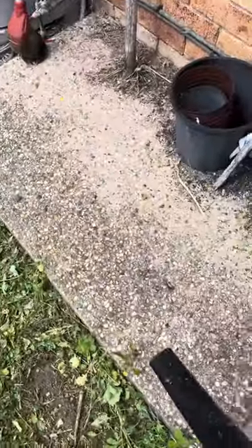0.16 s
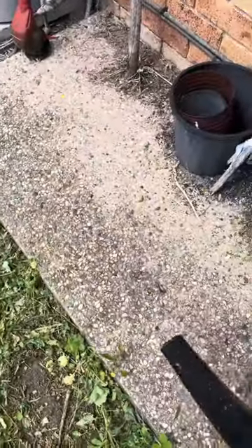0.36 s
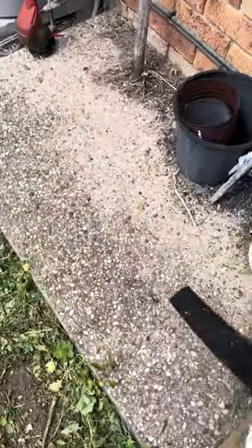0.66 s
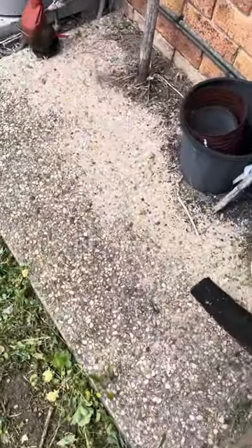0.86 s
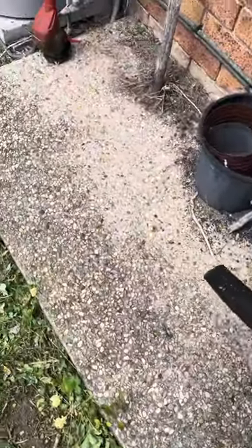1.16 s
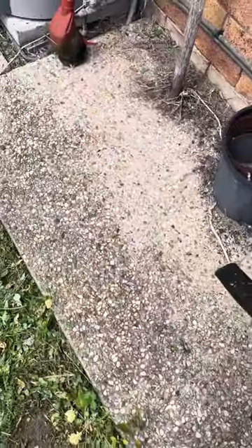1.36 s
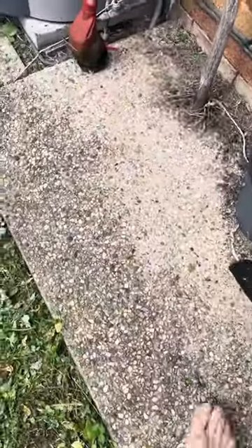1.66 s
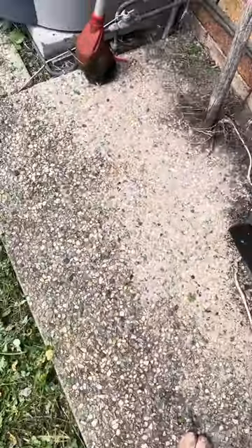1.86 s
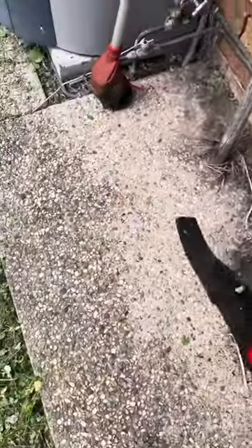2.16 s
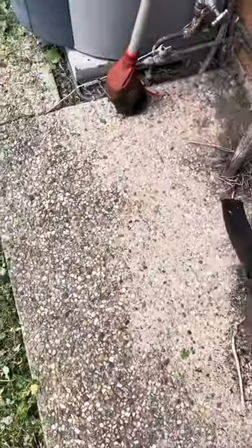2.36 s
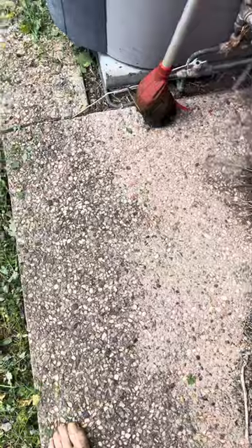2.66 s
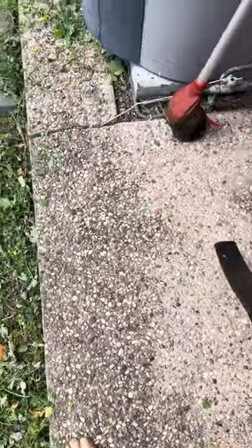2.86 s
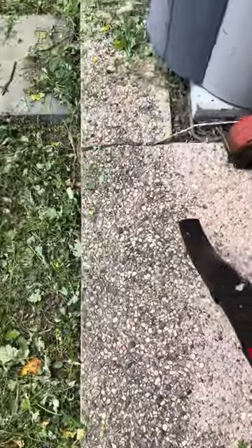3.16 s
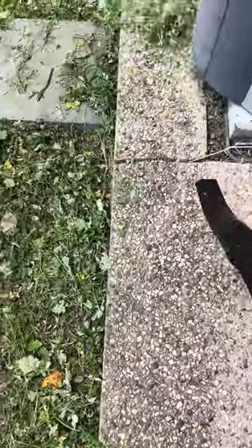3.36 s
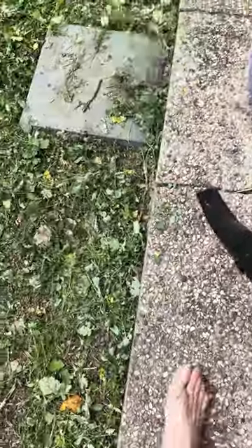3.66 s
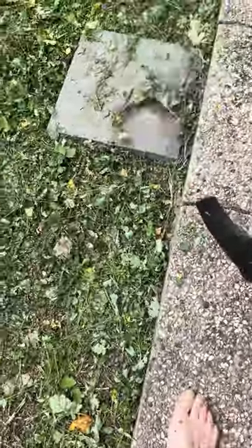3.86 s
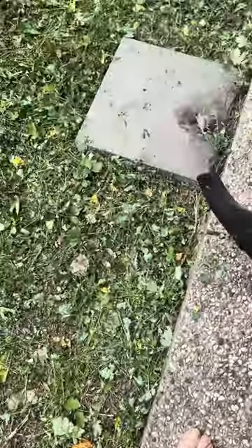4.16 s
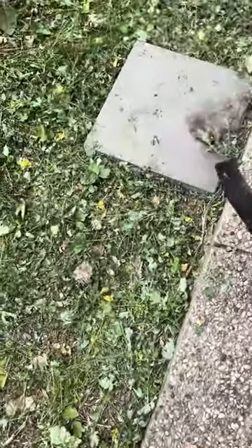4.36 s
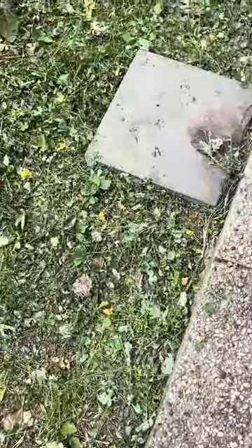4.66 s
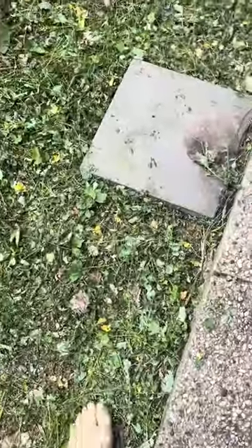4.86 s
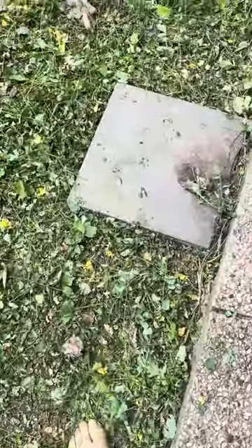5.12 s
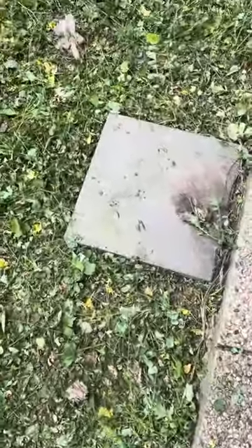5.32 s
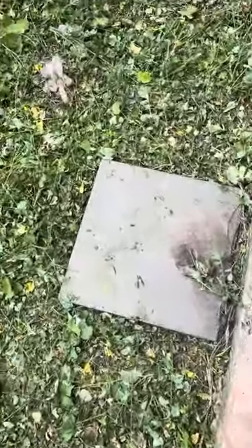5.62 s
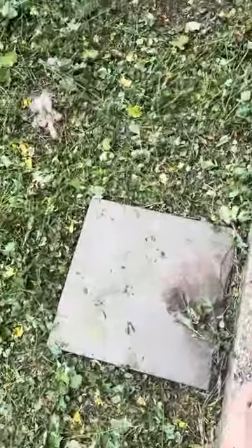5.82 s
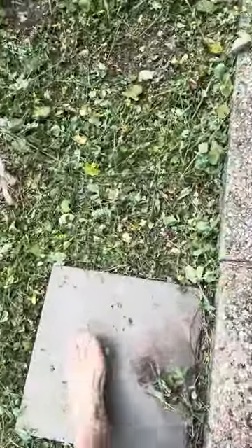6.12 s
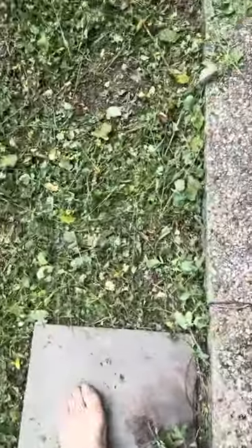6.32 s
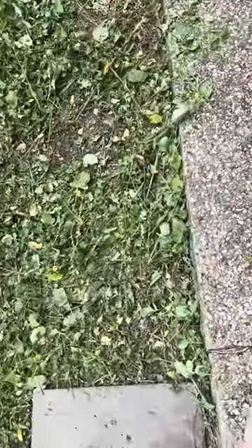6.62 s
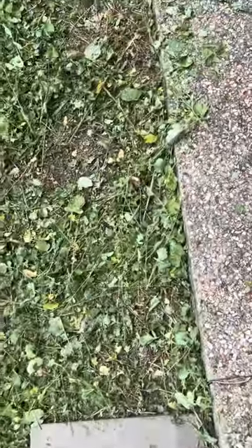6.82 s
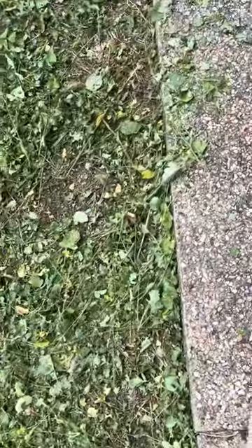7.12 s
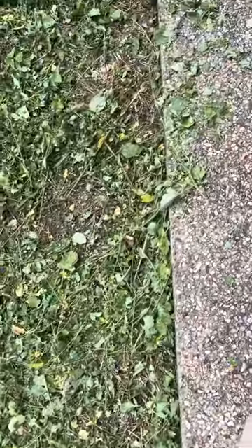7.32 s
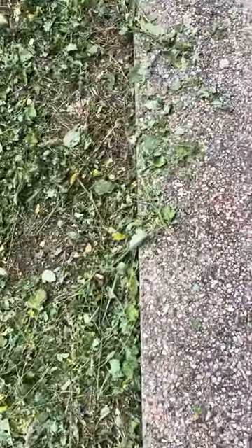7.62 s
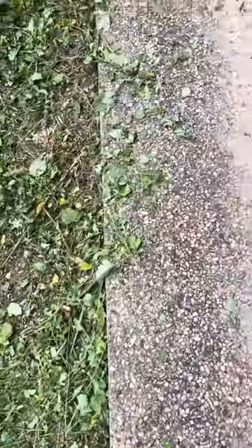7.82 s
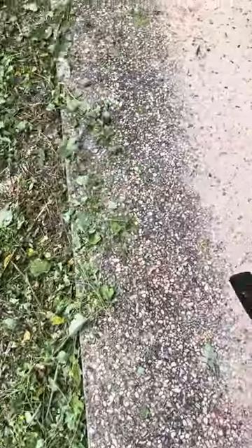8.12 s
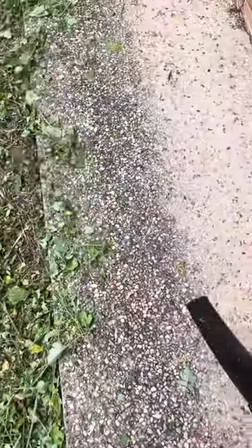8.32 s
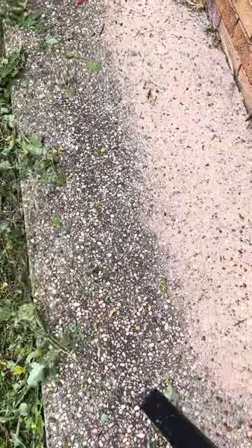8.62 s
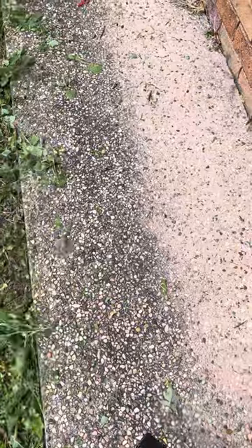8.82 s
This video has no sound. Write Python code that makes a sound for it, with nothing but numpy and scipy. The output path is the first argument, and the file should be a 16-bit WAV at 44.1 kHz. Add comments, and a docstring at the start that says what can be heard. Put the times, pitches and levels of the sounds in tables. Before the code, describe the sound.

Outdoors, close to a phone microphone, a handheld cordless leaf blower pushes a broad airy roar over paving from the very start, with fine hiss and slight low wind rumble. The fan whine, around 2 kHz, is weak and right-leaning at first, dips near 0.4 s, then swells to the left and is strongest around 0.75 s. It drops briefly at 1.6 s, returns more centred, and sings strongly from 2 to 4 s with short dips near 3.1 and 3.5 s. A faint octave overtone and low shaft hum flicker beneath. From 4 to 6 s the whine wavers slightly in pitch and the roar eases. Between 6 and 8 s everything is softer, the whine fluttering in and out. Around 8.3 s it nearly vanishes, its overtone briefly showing, then partly recovers as the air rush strengthens until the abrupt end at 9 s.

```python
"""A broad airy roar opens the scene; within a second a fan whine climbs through it, leaning right, then left.
This is a hand-held cordless leaf blower over paving, heard in stereo by a two-port phone microphone.
Coloured noise makes the roar of tube and housing, the jet's hiss and a little wind rumble on the microphone.
Sines locked to the fan's nine blades make the whine, its overtone and faint shaft hum;
level curves swell and dip them as the blower swings."""
import sys
import numpy as np
from scipy import signal
from scipy.fft import irfft, next_fast_len
from scipy.io import wavfile
from scipy.ndimage import uniform_filter1d, map_coordinates

SR = 44100
rng = np.random.default_rng(int(sys.argv[2]) if len(sys.argv) > 2 else 0)


def materialize(psi):
    """Save the field psi as 16-bit PCM at rate SR to the path in sys.argv[1].

    A 1-D psi becomes a single channel; in a 2-D psi each row is a channel.
    """
    bounded = np.clip(np.atleast_2d(psi).T, -1, 1)
    quanta = np.round(bounded * 32767).astype(np.int16)
    wavfile.write(sys.argv[1], SR, quanta)


N = 396018

T = np.arange(N) / SR
SIZE = next_fast_len(N)
F = np.arange(SIZE // 2 + 1) * SR / SIZE  # Hz of each spectrum bin


def undb(db):
    """Gain of a level in dB."""
    return np.exp(np.asarray(db) * (np.log(10) / 20))


def curves(table):
    """Columns of a time table, one value per sample."""
    start_s, *columns = np.transpose(table)
    return [np.interp(T, start_s, column) for column in columns]


def walk(rate):
    """Random wander: rate levels per second, each held, then smoothed twice; spread near 1."""
    hold = int(SR / rate)
    steps = np.repeat(rng.standard_normal(N // hold + 1), hold)
    return 1.535 * uniform_filter1d(uniform_filter1d(steps, hold), hold)[:N]


# Stereo spread along the spectrum: phase lead, balance and likeness of left and right;
# the top is nearly opposite in phase: pitch_hz, left_lead_rad, left_minus_right_db, likeness (0-1)
STEREO_SPREAD = [(0, 0, -.3, .985), (130, -.2, -.8, .995), (260, -.35, -1.5, .99), (350, -.62, -1.9, .97),
                 (520, -1.02, -3, .97), (800, -1.12, -3.7, .9), (1050, -1.12, -1.9, .76),
                 (1350, -.65, -.4, .83), (1800, .07, .3, .89), (2050, .53, 1.9, .87), (2350, 1.35, -1, .6),
                 (2850, 2.57, -3.1, .56), (3300, 2.25, -1.5, .35), (3800, 1.0, -2.3, .3),
                 (4400, 1.5, -3, .15), (4900, .82, -1.7, .57), (5400, 2.1, -.8, .7), (6100, 3.14, 0, .995),
                 (8100, 6.28, 0, .995), (10250, 9.42, 0, .995), (12400, 12.57, 0, .995),
                 (13600, 14.1, 0, .995), (14100, 15.71, 0, .998), (15800, 15.8, 0, .998)]


def stereo_spread(hz):
    """Phase lead, balance and likeness of left and right at a frequency."""
    pitch_hz, *columns = np.transpose(STEREO_SPREAD)
    return [np.interp(hz, pitch_hz, column) for column in columns]


def turbulence():
    """Spectra of white noise at left and right: partly shared, shifted and tilted."""
    lead, pan_db, like = stereo_spread(F)
    half_tilt = 10 ** (pan_db / 40) * np.exp(.5j * lead)  # half the spread goes to each side
    shared, left, right = rng.standard_normal((3, len(F))) + 1j * rng.standard_normal((3, len(F)))
    left_side = (np.sqrt(like) * shared + np.sqrt(1 - like) * left) * half_tilt
    right_side = (np.sqrt(like) * shared + np.sqrt(1 - like) * right) / half_tilt
    return np.array([left_side, right_side])


def rush(shape, db, parts, drift_db, flicker_db):
    """Coloured noise in overlapping bands of like power, each drifting and flickering alone."""
    noise, out = turbulence() * shape, 0
    power = shape ** 2
    band = np.cumsum(power) / np.sum(power) * parts - .5
    for k in range(parts):
        window = np.clip(1 - abs(np.clip(band, 0, parts - 1) - k), 0, 1)
        motion_db = drift_db * walk(1.49) + flicker_db * walk(22)
        out = out + irfft(noise * window, SIZE)[:, :N] * undb(motion_db)
    return out * undb(db) / np.std(out.mean(axis=0))  # levelled on the mean of left and right


def colour(points):
    """Gain through (Hz, dB) points on a log frequency scale, silent outside them."""
    hz, db = np.transpose(points)
    return undb(np.interp(np.log(F + 1), np.log(hz), db, left=-200, right=-200))


# Strength of the moving air: start_s, roar_db, then relative to the roar
# bass_db, hollow_middle_db, upper_middle_db, housing_db, treble_db; last wind_db (not relative)
AIR_LEVELS = [(0.1, -25.5, -5.5, -3, -9, -10.5, -16.5, -41), (0.65, -26, -3.5, -1.5, -6, -7.5, -14, -50),
              (1.2, -27, -6, -9, -4.5, -8, -15.5, -52), (1.75, -25, -11, -9, -11, -14, -18.5, -46.5),
              (2.3, -25.5, -7.5, -9, -4, -9.5, -14, -42.5), (2.85, -26.5, -9, -6.5, -6.5, -9, -14.5, -45),
              (3.4, -26.5, -9, -13, -13, -11, -17.5, -48), (3.95, -27, -10, -20, -12, -14, -18, -56),
              (4.5, -28, -8, -8, -6.5, -16.5, -15.5, -54), (5.05, -29, -6.5, -11, -3, -15, -17, -56),
              (5.6, -27.5, -6.5, -2.5, -13.5, -14.5, -18.5, -68),
              (6.15, -29, -6.5, -4.5, -8, -10.5, -18, -67), (6.7, -30.5, -6, -8, -15, -10.5, -16.5, -52),
              (7.25, -31.5, -10.5, -13, -7.5, -12.5, -16, -49),
              (7.8, -30, -13.5, -2.5, -15, -11.5, -15.5, -47.5),
              (8.35, -29.5, -14, -15, -13, -12.5, -17, -44.5), (8.9, -27.5, -15, -15, -8.5, -17, -19, -42)]


def air_levels():
    """The shared swell of the air: roar, bass, middle, upper, housing, treble and wind curves in dB."""
    return curves(AIR_LEVELS)


# Colour of the housing noise: pitch_hz, relative density_db (dB per Hz)
HOUSING_COLOUR = [(2000, 13.5), (2300, 1.5), (2700, -10), (3000, 5), (3500, 7.5), (3900, -3.5), (4400, 2)]


def housing():
    """Turbulent air ringing the housing: bright mid noise in sixteen restless bands."""
    roar_db, _, _, _, housing_db, _, _ = air_levels()
    return rush(colour(HOUSING_COLOUR), roar_db + housing_db, parts=16, drift_db=2.2, flicker_db=3.)


# Air resonances of the tube: pitch_hz, width_hz
TUBE_RESONANCES = [(230, 364), (450, 114), (640, 102), (800, 284), (1125, 55), (1345, 245), (1750, 940)]
# Trim of each resonance, in the same order: trim_db, added to its level curve
TUBE_TRIM = [-0.5, 2, -6, 1.5, -5, -1.5, 4]
# Four resonances swell and fade as the tube swings, levels before trim:
# start_s, near_450_hz_db, near_800_hz_db, near_1125_hz_db, near_1750_hz_db
TUBE_RINGING = [(0.0, -34.5, -32.5, -44, -34), (0.27, -37, -33.5, -40, -32.5),
                (0.5, -37.5, -32, -31, -35.5), (1.05, -36.5, -32.5, -37, -34.5), (1.12, -37, -35, -50, -37),
                (1.17, -44, -36.5, -33, -39), (1.38, -37, -37, -38, -34.5), (1.45, -37, -37, -41, -35),
                (1.67, -37.5, -32, -26, -34.5), (1.75, -38, -36, -44, -31.5), (1.85, -35, -30, -37, -37),
                (1.88, -32.5, -36, -44, -34.5), (3.1, -36, -38.5, -37, -34), (3.23, -37, -37, -44, -37),
                (3.28, -35, -43, -40, -34), (3.42, -37, -40, -43, -34), (3.53, -39, -37.5, -41, -32),
                (3.66, -37, -37, -43, -35.5), (3.88, -38, -38, -49, -36.5), (4.08, -38, -42, -36.5, -37),
                (5.08, -38, -41, -42, -38.5), (5.2, -35, -41, -43, -38.5), (5.48, -39, -38, -43, -37),
                (6.15, -37, -43.5, -37, -40), (6.22, -35, -41, -41, -39), (6.33, -41, -40.5, -37, -38),
                (6.53, -36.5, -35, -44, -39), (6.7, -42, -36, -39, -40.5), (6.75, -40.5, -36, -52, -39),
                (7.0, -38.5, -41, -32, -40), (7.6, -43, -38.5, -46, -39.5), (7.78, -42.5, -45, -47, -36),
                (7.93, -43, -40, -41, -40.5), (7.95, -38.5, -39, -47, -38.5),
                (8.9, -39.5, -39.5, -43, -36.5), (8.98, -46, -38, -46, -34)]


def tube():
    """Turbulent air ringing the tube: noise through seven resonances, each with its own level curve."""
    roar_db, bass_db, middle_db, upper_db, *_ = air_levels()
    low_db, hollow_db, narrow_db, high_db = curves(TUBE_RINGING)
    levels_db = [roar_db + bass_db, low_db, roar_db + middle_db, hollow_db, narrow_db,
                 roar_db + upper_db, high_db]
    out = 0
    for (hz, width), trim_db, level_db in zip(TUBE_RESONANCES, TUBE_TRIM, levels_db):
        # somewhat steeper than a single pole pair
        shape = (1 + ((F ** 2 - hz ** 2) / ((F + 1) * width)) ** 2) ** -.8
        out = out + rush(shape, trim_db + level_db, parts=1, drift_db=.8, flicker_db=0.97)
    return out


# The roar's return off the paving: start_s, extra_path_ms, share (0-1, relative to the direct sound)
PAVING_RETURN = [(0, 3.73, 0.5), (.9, 4.02, 0.3), (1.5, 3.9, 0.42), (2.5, 3.5, 0.21), (3.3, 3.76, 0.14),
                 (4.2, 3.54, 0.26), (4.8, 3.46, 0.48), (5.4, 3.91, 0.38), (6.3, 3.733, 0.18),
                 (7, 3.4, 0.27), (7.6, 3.46, 0.2), (8.2, 3.78, 0.37), (8.98, 3.5, 0.18)]


def ground(x):
    """Direct sound plus a moving late return that combs its colour; power is roughly kept."""
    extra_ms, share = curves(PAVING_RETURN)
    heard_at = np.arange(N) - extra_ms * SR / 1000
    late = np.array([map_coordinates(side, [heard_at], order=2, mode="wrap") for side in x])
    return (x + share * late) / np.sqrt(1 + share ** 2)


# Colour of the wind rumble: pitch_hz, relative density_db (dB per Hz)
WIND_COLOUR = [(22, -25), (35, -44), (50, 2.5), (80, -3.5), (130, -5), (170, -0.5)]


def wind():
    """Wind on the microphone: one band of low rumble, drifting and flickering."""
    *_, wind_db = air_levels()
    return rush(colour(WIND_COLOUR), wind_db, parts=1, drift_db=1.8, flicker_db=1.0)


# Colour of the jet: pitch_hz, relative density_db (dB per Hz)
JET_COLOUR = [(3700, 1), (4300, 0.5), (4900, 7.5), (5600, 4.5), (6200, -14)]


def jet():
    """The jet hissing over the ground: treble noise in eight flickering bands."""
    roar_db, *_, treble_db, _ = air_levels()
    above_treble_db = 2.5
    return rush(colour(JET_COLOUR), roar_db + treble_db + above_treble_db,
                parts=8, drift_db=1.5, flicker_db=2.6)


# Colour of the fine hiss: pitch_hz, relative density_db (dB per Hz)
FINE_COLOUR = [(5400, -20), (6000, 0), (7000, -3), (8300, -5), (8900, -3), (9600, -5), (10600, -3),
               (11600, -9), (12500, -8), (13500, -12), (14200, -9), (15800, -14)]


def fine_hiss():
    """The jet's fine hiss: steadier top-end noise in fourteen bands."""
    roar_db, *_, treble_db, _ = air_levels()
    return rush(colour(FINE_COLOUR), roar_db + treble_db, parts=14, drift_db=.3, flicker_db=1.6)


def air():
    """All the moving air; tube and housing also return off the paving."""
    return ground(housing() + tube()) + wind() + jet() + fine_hiss()


def tone(turns, db, pan_db, lead):
    """A sine through its cycle count, rms level in dB, panned and phase-shifted between left and right."""
    side = np.array([[.5], [-.5]])
    return np.sqrt(2) * undb(db + side * pan_db) * np.sin(2 * np.pi * turns + side * lead)


# Fan speed, wavering with the swing of the arm: start_s, blade_rate_hz (before the intake's jitter)
FAN_SPEED = [(0.5, 2012), (2.15, 2003), (2.81, 2018), (2.97, 2000), (3.04, 2030), (3.11, 2010),
             (3.84, 2037), (4.1, 2014), (4.19, 2037), (4.55, 2014), (4.64, 2052), (4.76, 1998),
             (4.88, 2048), (5.13, 2005), (5.54, 2043), (5.72, 2012), (5.86, 2040), (6.08, 2011),
             (6.27, 2030), (6.36, 2061), (6.64, 2028), (7.79, 2047), (8.22, 2033), (8.27, 2044),
             (8.31, 2047), (8.95, 2050)]


def blade_passes():
    """Running count of blade passes; eddies at the intake shake each one a little early or late."""
    hz, = curves(FAN_SPEED)
    speed_jitter_hz = 2.22 * walk(25)
    return np.cumsum(hz + speed_jitter_hz) / SR + 0.023 * walk(150)


# The whine as reflections add and cancel: start_s, level_db (before its flutter), left_minus_right_db
WHINE_LEVEL = [(0.0, -36, -15), (0.07, -31, -14), (0.1, -34, -14), (0.2, -26.5, -12), (0.33, -29, -16),
               (0.37, -43, 0.5), (0.445, -40, 10), (0.475, -27.5, 7), (0.53, -21, 7), (0.65, -18.5, 5),
               (0.75, -16.5, 6), (0.92, -18, 8.5), (1.22, -20.5, 6.5), (1.33, -22, 3), (1.5, -21.5, 4.0),
               (1.57, -34, -1.0), (1.62, -34, 18), (1.67, -34, 14), (1.82, -22, 3.5), (2.03, -20.5, 0),
               (2.15, -21, 2), (2.53, -18.5, 0), (2.77, -20.5, 1.0), (2.97, -20.5, 0.0), (3.07, -25.5, 3),
               (3.23, -18, 0.5), (3.49, -26.5, -3), (3.53, -34, -1), (3.58, -28.5, 0), (3.9, -17, 2),
               (4.15, -25.5, -1.0), (4.22, -23.5, 3.5), (4.7, -21, 1.5), (5.3, -24.5, 0.5),
               (5.48, -24.5, 5), (5.68, -22.5, 0), (5.95, -24, 3.5), (6.1, -33, -2), (6.22, -22.5, 1),
               (6.38, -24, 1.5), (6.45, -28.5, -3.0), (6.63, -30, 4), (6.68, -38, 1), (6.78, -26, -1),
               (6.85, -24, -0.5), (6.95, -32, 2.5), (7.0, -26.5, 3), (7.18, -33, -9), (7.35, -22.5, 1.5),
               (7.53, -31, 1), (7.68, -24.5, 0.0), (7.8, -28, 4.0), (7.9, -35, 14), (7.95, -32.5, 13),
               (8.06, -38, 8), (8.15, -26, 6), (8.2, -26, 3), (8.25, -40, 1), (8.33, -45, 8.0),
               (8.38, -45, 2), (8.45, -32.5, 2.0), (8.55, -35.5, -14), (8.65, -28.5, 0.5),
               (8.88, -27.5, 2.5), (8.98, -26.5, -0.5)]


def whine(passes):
    """Blade tone, one cycle per pass; its stereo phase wanders more the deeper it dips."""
    db, pan_db = curves(WHINE_LEVEL)
    dip_db = np.maximum(uniform_filter1d(db, SR) - db, 0)  # below its one-second average
    lead = 0.47 + 0.1 * dip_db * walk(9.5)  # radians left leads
    return tone(passes, db + 0.72 * walk(30), pan_db, lead)


# Second overtone of the whine: start_s, level_db (before its flutter)
OVERTONE_LEVEL = [(0.0, -47), (0.1, -48), (0.42, -41), (0.5, -25), (0.63, -44), (0.75, -36), (0.9, -47),
                  (1.0, -30), (1.07, -42), (1.3, -37), (1.42, -31), (1.47, -41), (1.54, -30), (1.6, -30),
                  (1.69, -33), (1.77, -48), (1.82, -31.5), (1.95, -50), (2.0, -38.5), (2.42, -38.5),
                  (2.5, -46), (2.63, -35), (2.68, -44), (2.97, -40.5), (3.07, -54), (3.25, -36),
                  (3.33, -52), (4.03, -40.5), (4.15, -67), (4.2, -38), (4.32, -56), (4.55, -33.5),
                  (4.68, -51), (4.75, -35), (4.83, -56), (4.86, -41), (4.96, -57), (5.05, -39), (5.1, -54),
                  (5.2, -42), (5.65, -45.5), (5.75, -35), (5.8, -49), (6.1, -35), (6.28, -47), (6.45, -38),
                  (6.5, -54), (6.7, -53), (6.8, -36.5), (7.05, -45), (7.12, -35), (7.165, -46), (7.2, -35),
                  (7.33, -49), (7.38, -39), (7.55, -50), (7.65, -35), (7.85, -42), (7.9, -36), (8.08, -45),
                  (8.33, -28.5), (8.4, -45), (8.53, -32), (8.63, -50), (8.75, -45), (8.88, -32.5),
                  (8.98, -36)]


def overtone(passes):
    """A sine at twice the blade rate; reflections make it come and go."""
    db, = curves(OVERTONE_LEVEL)
    pan_db, lead = -2.5 + 1.6 * walk(9), 1.5 + 0.3 * walk(5)
    return tone(2 * passes, db + 3.5 * walk(32), pan_db, lead)


BLADES = 9
# Multiples of the shaft rate: unbalanced shaft, motor, third overtone of the blades
HUM_MULTIPLES = (1, 5, 27)
# Hum on those multiples: level_db (at the mean air level), wavering_db, wavering_rate (levels per s)
HUM_LEVELS = [(-41, .6, 14.), (-47, 2, 8.), (-46, 4, 9.)]
# Faint lines: shaft_multiple, level_db (at the mean air level), wavering_db
SHAFT_LINES = [(15, -51, 4), (36, -56, 4), (45, -64, 5)]


def shaft_hum(passes):
    """Sines at multiples of the shaft rotation, following the air and wavering on their own."""
    roar_db, bass_db, *_ = air_levels()
    near_db = roar_db - roar_db.mean()
    blade_hz = curves(FAN_SPEED)[0].mean()
    lines = [(order, near_db + hum_db + waver_db * walk(rate))
             for order, (hum_db, waver_db, rate) in zip(HUM_MULTIPLES, HUM_LEVELS)]
    # the unbalanced shaft also follows the bass
    lines[0] = (1, lines[0][1] + 0.87 * (bass_db - bass_db.mean()))
    lines += [(order, near_db + line_db + waver_db * walk(15))
              for order, line_db, waver_db in SHAFT_LINES]
    out = 0
    for order, db in lines:
        lead, pan_db, _ = stereo_spread(order / BLADES * blade_hz)
        out = out + tone(order / BLADES * passes, db, pan_db, lead)
    return out


def fan():
    """Whine, overtone and shaft hum, all locked to the same spinning fan."""
    passes = blade_passes()
    return whine(passes) + overtone(passes) + shaft_hum(passes)


def scene():
    """The rush of air with the fan singing through it."""
    return air() + fan()


def record(dry):
    """The phone cuts the top steeply: an elliptic low-pass at 15750 Hz, 70 dB down in its stop band."""
    return signal.sosfilt(signal.ellip(10, .2, 70, 15750, fs=SR, output="sos"), dry)


dry = scene()
out = record(dry)
materialize(out)
```